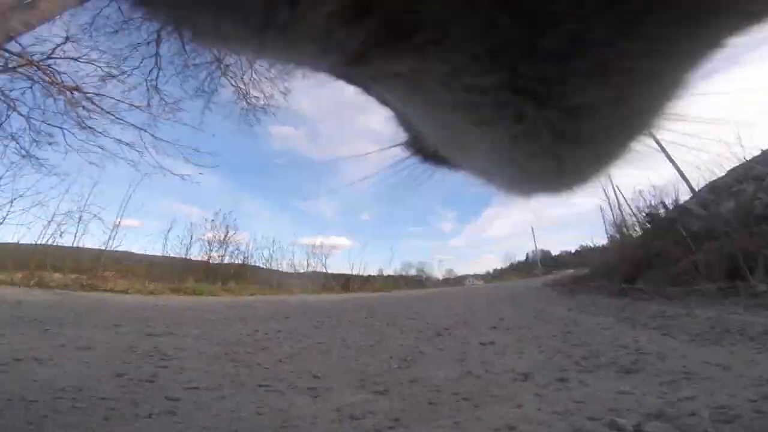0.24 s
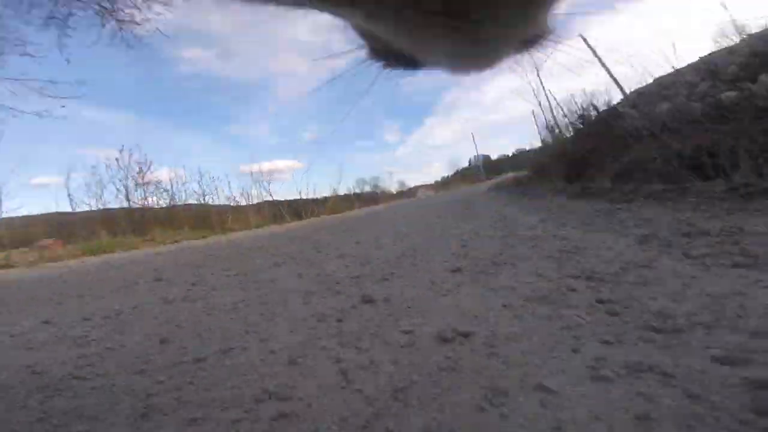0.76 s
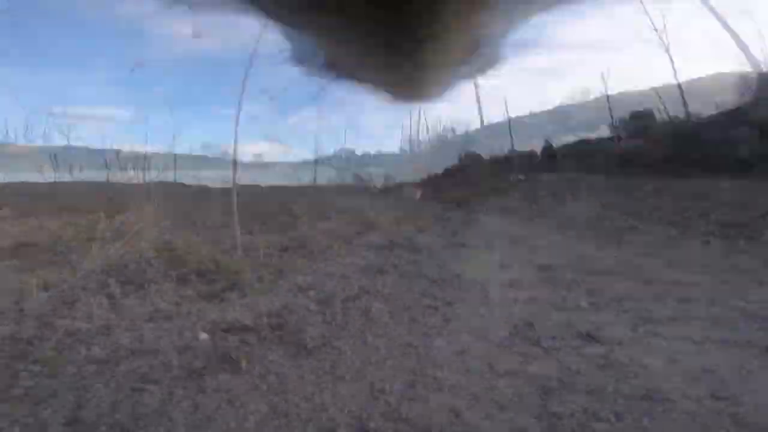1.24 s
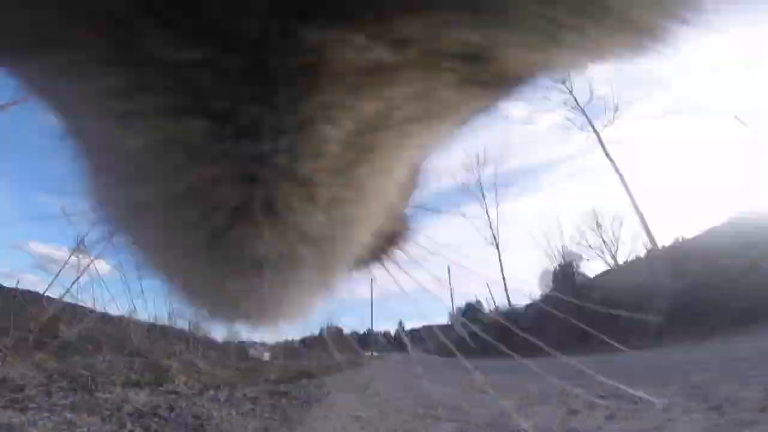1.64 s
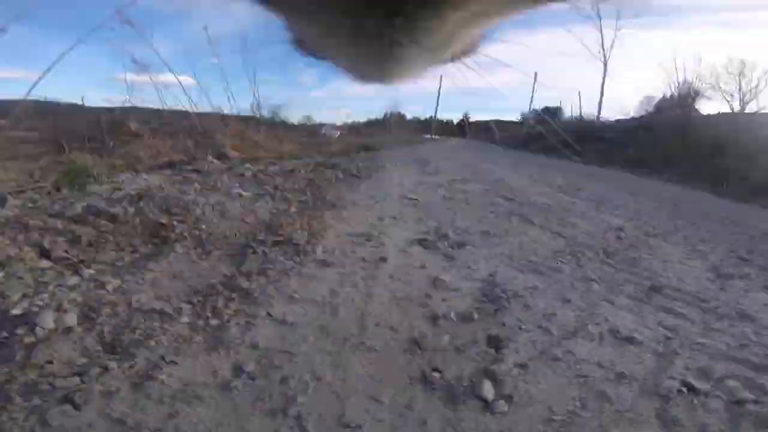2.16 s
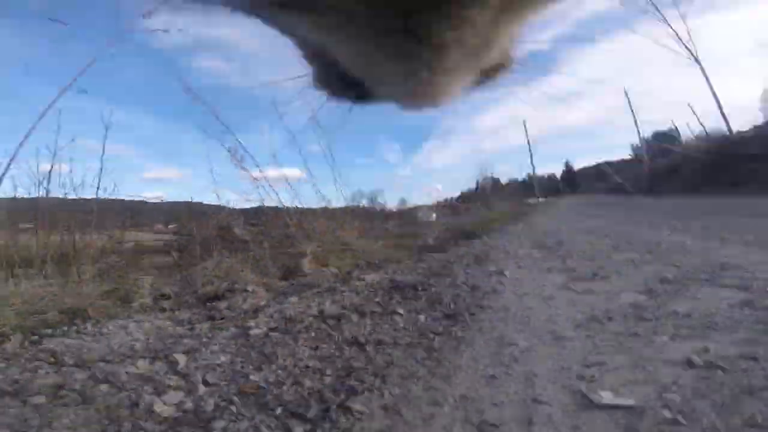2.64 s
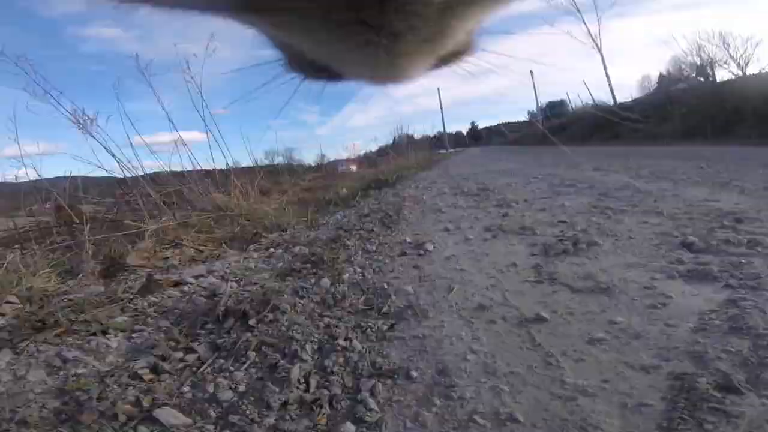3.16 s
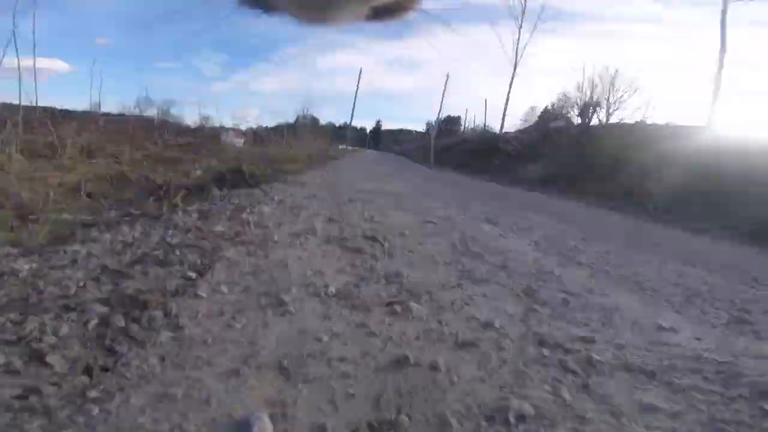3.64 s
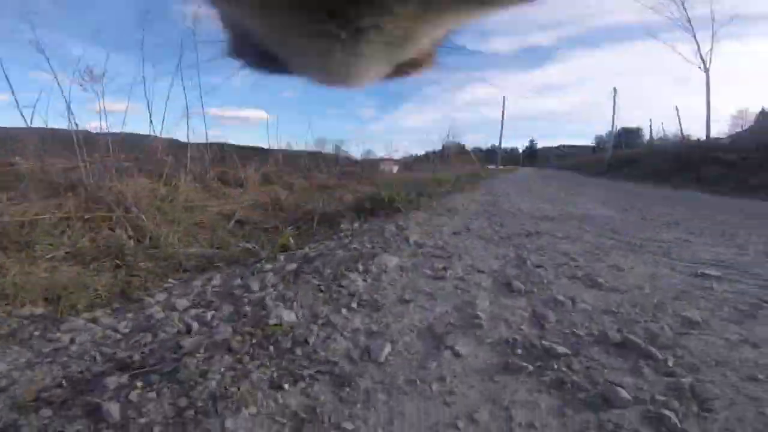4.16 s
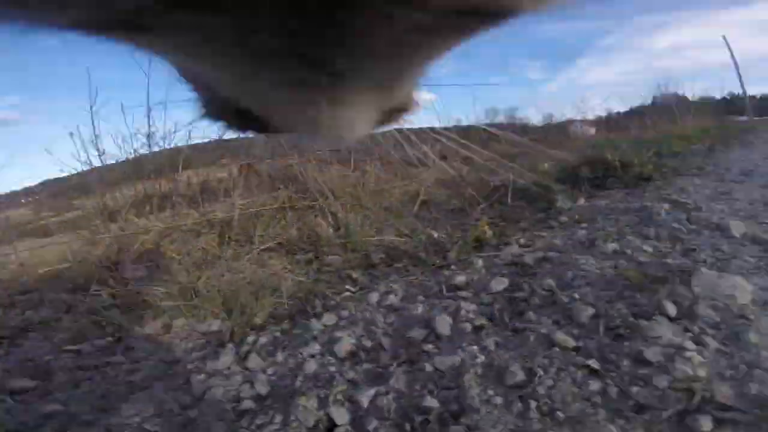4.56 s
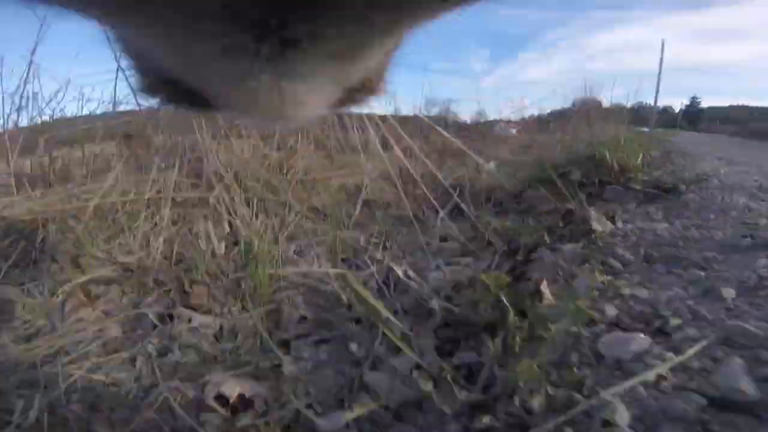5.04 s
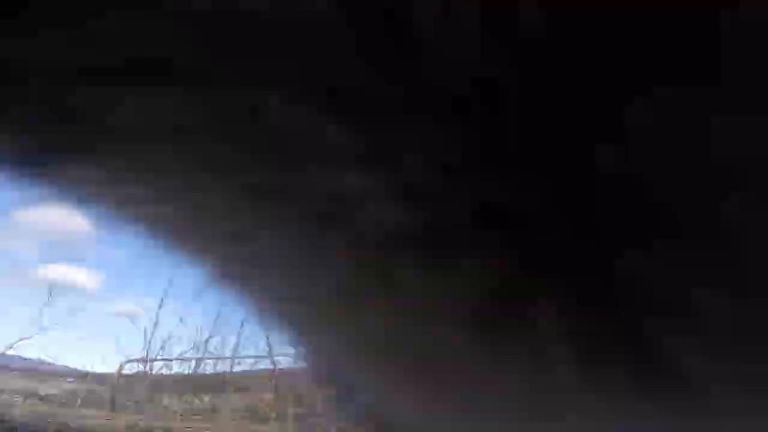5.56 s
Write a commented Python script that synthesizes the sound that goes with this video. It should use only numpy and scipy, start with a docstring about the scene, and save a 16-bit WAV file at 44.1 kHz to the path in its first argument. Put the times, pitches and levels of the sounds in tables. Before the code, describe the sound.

Close, uneven knocks, clicks and furry scuffs from a small camera swinging on a cat's collar, over lightly crunching grit.

```python
"""Fur rubs along the case of a small camera hanging from the collar of a cat trotting on gravel.
Grit crunches below, over a faint steady hiss. Each stride swings the camera: air and strap push
the microphone slowly, the body thumps it and the mount ticks against the plastic shell.
For a moment a thin hiss rings, as if the collar were pulled tight; now and then the port seals and pops."""
import sys
import numpy as np
from scipy import signal
from scipy.fft import rfft, irfft, next_fast_len
from scipy.io import wavfile
from scipy.ndimage import uniform_filter1d

SR = 44100
rng = np.random.default_rng(int(sys.argv[2]) if len(sys.argv) > 2 else 0)


def store_wav(level_fs):
    """Save 16-bit WAV to argv[1]."""
    pcm = np.round(np.clip(np.atleast_2d(level_fs), -1, 1) * 32767)
    wavfile.write(sys.argv[1], SR, pcm.T.astype(np.int16))


N = 256220


def from_db(db):
    """Decibels to gain."""
    return 10 ** (np.asarray(db) / 20)


def rms_one(x):
    """Scale to unit rms."""
    return x / np.sqrt(np.mean(x ** 2) + 1e-20)


def in_time(rows):
    """Curve of (seconds, value) rows, one value per sample."""
    return np.interp(np.arange(N) / SR, *np.transpose(rows))


def butter(x, order, hz, kind="low"):
    """Butterworth filter."""
    return signal.sosfilt(signal.butter(order, hz, kind, fs=SR, output="sos"), x)


def colour(x, points):
    """Shape by a spectrum of (Hz, dB), falling 29 dB per octave outside it; rms 1."""
    hz, db = np.transpose(points)
    size = next_fast_len(N)
    octave = np.log2(np.arange(1, size // 2 + 2) * SR / size)
    outside = np.maximum(np.log2(hz[0]) - octave, 0) + np.maximum(octave - np.log2(hz[-1]), 0)
    gain = from_db(np.interp(octave, np.log2(hz), db) - 29 * outside)
    return rms_one(irfft(rfft(x, size) * gain, size)[:N])


def drift(rate_hz):
    """Slow random wander; rms 1."""
    r = np.exp(-2 * np.pi * rate_hz / SR)
    return rms_one(signal.lfilter([1], [1, -2 * r, r * r], rng.standard_normal(N + SR))[SR:])


def ring(clicks, hz, t60):
    """One mode: a unit click starts a decaying sine of height 1."""
    r, w = from_db(-60 / (t60 * SR)), 2 * np.pi * hz / SR
    return signal.lfilter([0, np.sin(w)], [1, -2 * r * np.cos(w), r * r], clicks + 1e-18)


def resonate(x, modes):
    """Drive a bank of (Hz, dB, t60 seconds) modes; rms 1."""
    return rms_one(sum(from_db(db) * ring(x, hz, t60) for hz, db, t60 in modes))


def bursts(start_s, hold_s, peak_db, rise_db_per_s, fall_db_per_s, rest_db):
    """Gain of bursts that rise, hold and fall over a resting level."""
    t = np.arange(0, N + 32, 32)[:, None] / SR
    before_db = rise_db_per_s * np.maximum(start_s - t, 0)
    after_db = fall_db_per_s * np.maximum(t - start_s - np.abs(hold_s), 0)
    power = np.sum(from_db(peak_db - before_db - after_db) ** 2, axis=1) + from_db(rest_db) ** 2
    return np.interp(np.arange(N) / SR, t[:, 0], np.sqrt(power))


def click_sizes(spread_db):
    """One random signed size per sample, mostly small."""
    return from_db(spread_db * np.minimum(rng.exponential(1, N), 4)) * rng.choice([-1, 1], N)


def slips(per_s, spread_db, smooth):
    """Hairs catch and let go: uneven clicks over smooth drag noise."""
    sizes = click_sizes(spread_db)
    caught = rng.random(N) < per_s / SR
    return rms_one(sizes * caught) + smooth * rng.standard_normal(N)


def grit(per_s, range_hz, cycles):
    """Gravel shifts in clumps, each grain ringing briefly at one of ten pitches; rms 1."""
    sizes = click_sizes(spread_db=3)
    struck = rng.random(N) < per_s * from_db(5 * drift(25)) / SR
    pitch_index = rng.integers(0, 10, N)
    pitches_hz = np.geomspace(*range_hz, 10)
    return rms_one(sum(ring(sizes * struck * (pitch_index == k), hz, cycles / hz)
                       for k, hz in enumerate(pitches_hz)))


# Plastic shell modes. Each row: frequency in Hz, relative gain in dB, t60 in seconds.
SHELL_MODES = [(820, 6.5, 0.00091), (1552, -4.5, 0.011), (2070, 4, 0.0088), (2510, 6.5, 0.0091),
               (2790, 7, 0.0032), (3270, -12, 0.0098), (3710, -4.5, 0.011), (4360, 5, 0.001),
               (5930, 6, 0.0096), (7980, 11, 0.0033)]
# Rustle spectrum. Each row: frequency in Hz, relative gain in dB.
RUSTLE_SPECTRUM = [(750, -3), (1050, 1), (1700, 0.5), (2600, -3.5), (3600, -11), (4300, -22)]


def rustle(drag):
    """Midrange of the drag, with a trace of shell ring and coarse stones shifting."""
    stones = from_db(-8.5) * grit(per_s=90, range_hz=(900, 4260), cycles=11.5)
    return colour(drag + 0.051 * resonate(drag, SHELL_MODES) + stones, RUSTLE_SPECTRUM)


# Fur hiss spectrum. Each row: frequency in Hz, relative gain in dB.
HISS_SPECTRUM = [(3300, -1.5), (4300, -4.5), (5200, 1.5), (6300, -2), (7000, -5), (10000, -15.5),
                 (13500, -29)]


def fur_hiss():
    """Dense small hair slips, with fine grains crunching."""
    hairs = slips(per_s=3000, spread_db=1.5, smooth=2.6) / 1.47
    grains = from_db(-7.5) * grit(per_s=250, range_hz=(3600, 9300), cycles=17)
    return colour(hairs + grains, HISS_SPECTRUM)


# Spectra of the two low bands of the rub. Each row: frequency in Hz, relative gain in dB.
RUMBLE_SPECTRUM = [(60, -6.5), (100, 0), (260, -9), (340, -21)]
SCUFF_SPECTRUM = [(220, 7.5), (320, 9.5), (600, 4.5), (900, -5.5), (1200, -11.5)]
# Fur strokes. Each row: peak time in seconds, swell in seconds, fade in seconds, scuff level in dB,
# rumble over scuff in dB, hiss over scuff in dB.
FUR_STROKES = [(.005,0.07,0.018,-55,7,-13),(0.112,0.11,0.094,-49,7,-14),(0.258,0.14,0.079,-55.5,13,-13.5),
               (.39,0.1,0.074,-55,10,-10),(.441,0.16,0.22,-52.5,-1,-29),(.535,0.15,0.1,-60,16,-1),
               (.69,0.055,0.026,-61.5,10,2),(.79,0.1,0.14,-55,-1,-15),(0.86,0.079,0.056,-47,-6,-11.5),
               (.99,0.14,0.091,-54.5,7,-12.5),(1.09,0.22,0.2,-61.5,7.5,-12),(1.207,0.04,0.031,-56,7,-17),
               (1.286,0.011,0.026,-35.5,-21,-19.5),(1.335,.03,0.042,-51,9,-23),(1.41,0.083,0.35,-58.5,-1,-11),(1.535,0.054,0.045,-45,1,-15),
               (1.6,0.076,0.048,-52,10,-5.5),(1.681,0.079,0.052,-58,14,-26),(1.795,0.088,0.11,-58,12.5,-10),
               (1.87,0.034,0.52,-53.5,0,-19),(1.95,0.13,0.24,-63,-6,-5.5),(2.049,0.025,0.017,-51.5,11,-10),
               (2.208,0.046,0.15,-56.5,3,-10.5),(2.25,0.075,0.072,-54,14.5,-15.5),(2.35,0.062,0.069,-62,7,-5.5),
               (2.494,0.028,0.058,-61.5,16,-1.5),(2.58,0.21,0.29,-59.5,4,-21),(2.68,0.14,0.11,-60,1,-8),
               (2.766,0.2,0.035,-61.5,0,-39),(2.898,0.069,0.13,-47.5,4.5,-16),(2.97,0.052,0.092,-63.5,15,0.5),
               (3.041,0.067,0.025,-58,6,-4.5),(3.264,0.12,0.22,-44,4,-17.5),(3.34,0.093,0.14,-62,8,-1.5),
               (3.41,0.38,0.038,-68,19,2),(3.613,0.074,0.13,-47.5,7,-15),(3.77,0.042,0.052,-77,15,-28),
               (3.844,0.13,0.12,-57,13,-11.5),(4.007,0.097,0.096,-43,3,-16.5),(4.269,0.11,0.073,-48,2.5,-16.5),
               (4.37,0.054,0.48,-61,4,-12.5),(4.556,0.085,0.079,-62.5,19,-8.5),(4.753,0.083,0.23,-55,4.5,-7),
               (4.88,0.041,0.18,-64.5,24.5,-2),(4.991,0.019,0.11,-55.5,13,-2),(5.09,0.13,0.21,-53.5,3.5,-7.5),
               (5.16,0.089,0.079,-55.5,-8,-6),(5.25,0.07,0.17,-60.5,-5,2),(5.386,0.036,0.33,-46.5,-11,-15),
               (5.449,0.11,0.082,-46.5,5.5,-16.5),(5.55,0.26,0.063,-53,12.5,-2.5),(5.59,0.062,0.081,-45.5,0,-7),
               (5.64,0.12,0.062,-58.5,13,12.5),(5.7,0.044,0.024,-56,4,-3),(5.753,0.031,0.061,-37,4,-15.5),(5.8,0.015,0.12,-39,-2,-17)]


def fur_rub():
    """Fur drags along the case under uneven pressure: rumble, scuff, rustle and hiss."""
    peak_s, swell_s, fade_s, scuff_db, rumble_over_db, hiss_over_db = np.transpose(FUR_STROKES)
    span_db = 20  # gained over a swell, lost over a fade

    def strokes(over_db, rest_db):
        return bursts(peak_s, 0, scuff_db + over_db,
                      span_db / np.abs(swell_s), span_db / np.abs(fade_s), rest_db)

    pressure_db, grip = 2.4 * drift(30), drift(70)
    coarse_drag = slips(per_s=200, spread_db=4.1, smooth=0.5)
    drag = slips(per_s=1500, spread_db=3.2, smooth=1.28)
    rumble = colour(coarse_drag, RUMBLE_SPECTRUM) * strokes(rumble_over_db, rest_db=-66)
    scuff = colour(drag, SCUFF_SPECTRUM) * strokes(0, rest_db=-86)
    rustling = rustle(drag) * strokes(1.5 + 0.69 * hiss_over_db, rest_db=-103)
    hiss = fur_hiss() * strokes(hiss_over_db, rest_db=-83.5)
    return (rumble * from_db(pressure_db)
            + scuff * from_db(pressure_db + 1.2 * grip)
            + rustling * from_db(pressure_db + 2.2 * grip)
            + hiss * from_db(pressure_db / 2 + 2.36 * drift(52)))


# Spectra of the self-noise and the top hiss. Each row: frequency in Hz, relative gain in dB.
FLOOR_SPECTRUM = [(2000, -4.5), (3300, -4.5), (3700, -1), (4100, -23), (6000, -9.5), (8800, -7)]
TOP_SPECTRUM = [(9000, -1), (11000, 0), (13500, -1.5)]
# Top hiss envelope. Each row: time in seconds, relative level in dB.
TOP_ENVELOPE = [(0.0, -76), (0.76, -75.5), (1.47, -75.5), (1.84, -95), (2.07, -90), (3.04, -79),
                (5.28, -74.5), (5.8, -87.5)]


def noise_floor():
    """Flickering self-noise, and a faint top hiss that fades and returns."""
    floor = from_db(-77 + 1.8 * drift(18)) * colour(rng.standard_normal(N), FLOOR_SPECTRUM)
    top_db = in_time(TOP_ENVELOPE) - 4 + 1.9 * drift(18)
    return floor + from_db(top_db) * colour(rng.standard_normal(N), TOP_SPECTRUM)


# Push spectrum. Each row: frequency in Hz, relative gain in dB.
PUSH_SPECTRUM = [(7, 0), (22, 0), (40, -6), (68, -15)]
# Camera swings. Each row: start of the hold in seconds, hold in seconds, level in dB.
CAMERA_SWINGS = [(0.026, 0.13, -34), (0.294, 0.045, -34.5), (0.39, 0.077, -36), (0.488, 0.073, -35.5),
                 (0.594, 0.028, -39), (0.842, 0.038, -27.5), (1.066, 0.014, -36), (1.217, 0.15, -34.5),
                 (1.551, 0.053, -29.5), (1.556, 0.017, -37), (1.873, 0.024, -27), (1.966, 0.024, -33.5),
                 (2.22, 0.019, -28), (2.296, 0.044, -33.5), (2.548, 0.053, -33.5), (2.61, 0.063, -38.5),
                 (2.703, 0.065, -37.5), (2.92, 0.082, -36), (3.227, 0.05, -30), (3.295, 0.095, -31.5),
                 (3.597, 0.093, -29), (3.899, 0.04, -28.5), (4.038, 0.022, -26), (4.265, 0.084, -35),
                 (4.71, 0.16, -45.5), (5.047, 0.045, -35), (5.358, 0.017, -35), (5.45, 0.056, -27.5),
                 (5.779, 0.014, -26)]


def camera_swing():
    """Air and strap push the microphone at each swing: lumpy, largely infrasonic pressure."""
    push = colour(rng.standard_normal(N), PUSH_SPECTRUM)
    push /= np.sqrt(uniform_filter1d(push ** 2, size=3600) + 0.99)  # evened so the stride sets the size
    stride = bursts(*np.transpose(CAMERA_SWINGS), rise_db_per_s=253, fall_db_per_s=270, rest_db=-47)
    return stride * rms_one(push)


# Body blows. Each row: crest time in seconds, relative level in dB, pitch in Hz, push (1) or pull (-1).
BODY_THUMPS = [(0.0402, -23, 160, 1), (0.1342, -42, 230, 1), (0.2758, -28.5, 110, 1),
               (0.344, -29.5, 230, 1), (0.537, -25, 260, 1), (0.612, -22, 18, -1), (0.635, -26, 24, 1),
               (0.6423, -38, 250, -1), (0.7102, -26, 230, 1), (0.853, -18.5, 26, 1), (0.894, -20, 26, -1),
               (0.916, -36, 24, 1), (0.864, -34, 280, -1), (0.8723, -28.5, 220, -1), (0.947, -34, 220, 1),
               (1.1298, -34.5, 350, 1), (1.2865, -11, 98, 1), (1.327, -43, 130, 1), (1.4002, -32, 510, -1),
               (1.5242, -20.5, 113, -1), (1.539, -19, 440, 1), (1.6718, -24.5, 217, 1),
               (1.6931, -29.5, 270, 1), (1.706, -27, 290, 1), (1.781, -34, 290, -1), (1.79, -32, 340, -1),
               (1.833, -30, 530, 1), (1.84, -15.5, 38, 1), (1.858, -16, 20, -1), (1.877, -19, 22, 1),
               (1.7985, -35.5, 240, -1), (1.903, -31, 140, 1), (2.049, -27, 185, 1), (2.189, -25.5, 41, 1),
               (2.202, -23.5, 450, 1), (2.239, -23.5, 330, 1), (2.478, -33.5, 226, -1),
               (2.5035, -33.5, 480, -1), (2.53, -29.5, 226, -1), (2.748, -33, 200, -1),
               (2.7728, -32, 440, -1), (2.782, -29.5, 210, 1), (2.936, -20, 12.7, 1),
               (2.977, -20, 15.7, -1), (3.0312, -29.5, 220, -1), (3.045, -27.5, 260, 1),
               (3.179, -29, 240, -1), (3.207, -19.5, 31, 1), (3.226, -15, 36, -1), (3.275, -14.5, 15, 1),
               (3.335, -19.5, 18.3, -1), (3.376, -18.5, 24, 1), (3.4398, -18.5, 233, 1),
               (3.68, -30, 29, -1), (3.7642, -18.5, 263, 1), (3.8692, -27.5, 225, -1),
               (3.9968, -23, 230, 1), (4.049, -21, 23, 1), (4.067, -12, 18.3, -1), (4.088, -29, 19, 1),
               (4.091, -32, 180, 1), (4.3573, -27.5, 174, 1), (4.561, -23, 270, 1), (4.695, -31, 206, -1),
               (4.8125, -28.5, 290, -1), (4.877, -23.5, 217, 1), (4.885, -22.5, 184, 1),
               (4.983, -19.5, 76, 1), (5.153, -26, 206, 1), (5.3626, -17, 320, 1), (5.371, -19.5, 31, -1),
               (5.47, -15, 19, -1), (5.3888, -22.5, 82, 1), (5.448, -21, 170, 1), (5.513, -30, 310, -1),
               (5.575, -15, 200, 1), (5.5913, -13.5, 224, 1), (5.6027, -16, 330, 1), (5.7359, -12.5, 95, 1),
               (5.75, -10, 64, 1), (5.763, -9.5, 30.7, -1)]


def body_thumps():
    """Soft blows set the whole camera in a damped swing; pulls ring longer, hard blows die sooner."""
    out, t = np.zeros(N + SR), np.arange(SR // 4) / SR
    for crest_s, level_db, hz, direction in BODY_THUMPS:
        start = round((crest_s - 0.204 / hz) * SR)  # contact is nearly a quarter cycle before the crest
        t60_cycles = (2.85 if direction > 0 else 4.1) * np.exp(-0.0225 * (level_db + 30))
        blow = np.sin(2 * np.pi * hz * t) * from_db(-60 * t * hz / t60_cycles)
        out[start:start + len(t)] += np.sign(direction) * from_db(level_db + 2) * blow
    return butter(out[:N], 1, 2500)


ROCK_S, MIN_BREADTH_OCT = 0.0006, 0.15


def faint_ticks(per_s):
    """Weak contacts at random times, as rows like MOUNT_TICKS."""
    when, low, upper, pitch = rng.random((round(per_s * N / SR), 4)).T
    start_s = when * (N / SR - ROCK_S * 2)
    low_db, upper_db = -54 + 3 * np.log([low + 0.05, upper + 0.05])
    centre_hz = 3400 * 2 ** (pitch - 0.5)
    return np.transpose([start_s, low_db, upper_db, centre_hz, np.full_like(when, 0.5)])


def contact_snaps(start_s, upper_db, centre_hz, breadth_oct):
    """Each contact rings a few cycles at its own pitch, shorter and weaker when broad."""
    out, t = np.zeros(N + 512), np.arange(512) / SR
    peaks = from_db(upper_db - 1.5 - 13 * breadth_oct)
    crest_cycles = 0.57 / np.sqrt(np.maximum(breadth_oct, MIN_BREADTH_OCT))
    for when_s, peak, hz, cycles in zip(start_s, peaks, centre_hz, crest_cycles):
        start = round(when_s * SR)
        age = t * hz / cycles
        envelope = (age * np.exp(1 - age)) ** 2
        out[start:start + 512] += peak * envelope * np.sin(2 * np.pi * hz * t)
    return out[:N]


def shell_ring(start_s, low_db, upper_db, centre_hz, breadth_oct):
    """Contacts strike the shell: a low ring, and upper modes strongest near each contact's centre."""
    strike = np.round(start_s * SR).astype(int)
    rock_back = np.round((start_s + ROCK_S) * SR).astype(int)
    mode_hz, mode_db, _ = np.transpose(SHELL_MODES)
    upper = mode_hz > 1800
    off_centre = np.log2(mode_hz[:, None] / centre_hz) / np.maximum(breadth_oct, MIN_BREADTH_OCT)
    shares = from_db(mode_db[:, None] - np.minimum(4 * off_centre ** 2, 20))
    shares /= np.sqrt(np.sum(shares[upper] ** 2, axis=0))
    narrow_loss_db = 4.5 * (1 - np.minimum(breadth_oct, 1))
    out = np.zeros(N)
    for (hz, db, t60), share, is_upper in zip(SHELL_MODES, shares, upper):
        scatter, rebound, polarity = rng.standard_normal((len(start_s), 3)).T
        size = share * from_db(upper_db - narrow_loss_db) if is_upper else from_db(low_db + db + 5)
        size *= from_db(2.5 * scatter)
        clicks = np.zeros(N)
        clicks[strike] = size * (1 if is_upper else np.sign(polarity))  # upper modes follow the snap
        clicks[rock_back] = 0.25 * size * rebound
        drive = butter(clicks + 1e-18, 1, [hz * 0.68, hz * 1.26], "band")  # ring swells over a cycle
        out += ring(drive, hz, t60)
    return out


# Mount contacts. Each row: start in seconds, relative levels of the low and the upper ring in dB,
# centre of the upper ring in Hz, breadth in octaves.
MOUNT_TICKS = [(0.0402, -36, -42, 3280, 0.34), (0.102, -42.5, -42, 3330, 0.5), (0.116, -35, -23, 3180, 0.1),
               (0.3435, -40.5, -45, 3180, 0.3), (0.4644, -34.5, -47, 2790, 0.74),
               (0.489, -40, -43, 3370, 0.68), (0.5126, -51, -30.5, 3100, 0.26),
               (0.534, -29.5, -32, 3100, 0.29), (0.5372, -31.5, -19.5, 3070, 0.1),
               (0.5517, -61, -39, 4010, 0.55), (0.5868, -37.5, -35.5, 3710, 0.2),
               (0.6145, -49, -41, 7200, 0.5), (0.6921, -32, -31, 3270, 0.14),
               (1.1297, -36, -32, 3350, 0.46), (1.2005, -59, -52, 2600, 0.76),
               (1.2385, -50, -33, 2040, 0.36), (1.2635, -56, -45, 3300, 0.44),
               (1.2791, -40, -37, 2870, 0.37), (1.2844, -33, -45, 3720, 0.46),
               (1.3404, -36, -33.5, 2400, 0.1), (1.399, -48, -28.5, 4700, 0.23),
               (1.4091, -34.5, -31.5, 2350, 0.49), (1.442, -37.5, -36, 2600, 0.43),
               (1.5233, -42, -35, 4550, 0.66), (1.5377, -33, -29, 4550, 0.93),
               (1.5512, -51, -40, 4460, 0.94), (1.6513, -45, -39, 3040, 0.62), (1.663, -46, -46, 2200, 0.5),
               (1.6715, -52, -39, 5120, 0.52), (1.6937, -37, -33, 4740, 0.45),
               (1.7048, -61, -38, 3600, 0.82), (1.7199, -47, -43, 2600, 0.57),
               (1.7803, -35, -31.5, 3000, 0.64), (1.8308, -50, -45, 2560, 0.57),
               (1.9046, -44.5, -36, 4300, 0.87), (1.9339, -47, -38.5, 3300, 0.32),
               (1.9917, -47, -26.5, 3600, 0.43), (2.0453, -40, -36, 3740, 0.52),
               (2.0551, -50, -38, 3170, 0.6), (2.2016, -65, -33.5, 4500, 0.69),
               (2.237, -47, -34.5, 3500, 1), (2.2626, -41.5, -35.5, 3650, 0.98),
               (2.3373, -37, -27.5, 3420, 0.52), (2.4237, -37.5, -38, 3140, 0.48),
               (2.5035, -55.0, -36, 4520, 0.24), (2.5271, -35.5, -33, 3520, 0.75),
               (2.6242, -40, -32, 3260, 0.32), (2.7007, -48.5, -43, 3270, 0.36),
               (2.7471, -38.5, -29.5, 3970, 0.3), (2.7826, -40, -29, 3250, 0.6),
               (3.0385, -44, -38, 3700, 0.31), (3.055, -46.5, -47, 2500, 0.47),
               (3.172, -36.5, -26.5, 3900, 0.43), (3.1785, -37, -37, 3300, 0.2),
               (3.2102, -44, -44, 3160, 0.93), (3.2592, -38.5, -42, 3360, 0.76),
               (3.319, -43, -33.5, 3100, 0.16), (3.3984, -38, -31.5, 3550, 0.25),
               (3.42, -30, -34, 2570, 0.4), (3.4414, -39, -32, 3030, 0.85), (3.6191, -44, -42, 3550, 0.97),
               (3.762, -29.5, -27.5, 3240, 0.92), (3.7905, -44, -56, 2300, 0.44),
               (3.8268, -44, -35.5, 3840, 0.46), (3.8518, -36, -26.5, 3570, 0.48),
               (3.9948, -44, -28.5, 2900, 0.11), (4.0342, -41, -39.5, 4130, 0.93),
               (4.091, -40, -26.5, 3100, 0.44), (4.157, -52, -45, 3300, 0.37),
               (4.3542, -39, -30, 3640, 0.41), (4.5124, -43.5, -39, 4500, 0.43),
               (4.527, -45, -58, 2500, 0.4), (4.5611, -50, -34, 2800, 0.21), (4.696, -50, -59, 2500, 0.5),
               (4.8125, -50, -46, 3600, 0.37), (4.863, -64, -45, 7600, 0.33), (4.8701, -33, -35, 2510, 1),
               (4.8761, -36.5, -34.5, 3420, 0.38), (4.9865, -65, -33, 4030, 0.48),
               (4.9925, -60, -43, 2640, 0.35), (5.001, -60, -40, 3700, 0.16),
               (5.0165, -40.5, -43, 3600, 0.53), (5.1072, -33, -22, 3200, 0.4),
               (5.1498, -36, -42, 3760, 0.43), (5.163, -40.5, -41, 3690, 0.33),
               (5.172, -43, -44, 3570, 0.38), (5.3899, -50, -36, 5600, 0.3),
               (5.2346, -40.5, -55, 3650, 0.59), (5.3615, -33.5, -31, 5700, 0.25),
               (5.5128, -33, -18, 4030, 0.11), (5.5132, -42, -27, 2230, 0.23),
               (5.5412, -53.4, -41, 2600, 0.25), (5.5505, -52, -39, 2500, 0.3),
               (5.5681, -36, -26, 4100, 0.57), (5.5743, -23, -25, 2980, 0.54),
               (5.5899, -40, -26.5, 5200, 0.28), (5.6023, -40, -21.5, 3370, 0.89),
               (5.638, -55, -42, 5100, 0.42), (5.6556, -61, -27, 4700, 0.13),
               (5.6595, -39, -25, 4350, 0.23), (5.6672, -38, -35, 4900, 0.45),
               (5.6726, -47, -30, 4800, 0.14), (5.7242, -39.5, -42, 2880, 0.19),
               (5.7569, -35.5, -39, 4030, 1), (5.7637, -35, -31, 4500, 0.93)]


def mount_ticks():
    """The mount taps the shell, which passes little of one band; soft contact dulls the top."""
    dead_band_hz, contact_hz = (4500, 5400), 7670
    contacts = np.concatenate([MOUNT_TICKS, faint_ticks(per_s=3)])
    start_s, low_db, upper_db, centre_hz, breadth_oct = contacts.T
    ticks = contact_snaps(start_s, upper_db, centre_hz, breadth_oct)
    ticks += shell_ring(start_s, low_db, upper_db, centre_hz, breadth_oct)
    ticks -= 0.7 * butter(ticks, 1, dead_band_hz, "band")
    return butter(ticks, 2, contact_hz)


# Collar hiss envelope. Each row: time in seconds, level in dB.
COLLAR_ENVELOPE = [(1.12, -84), (1.2, -71), (1.45, -62.5), (1.68, -62), (1.76, -80), (1.85, -105)]
# Its resonances. Each row: frequency in Hz, relative gain in dB, t60 in seconds.
COLLAR_MODES = [(2220, -2.5, 0.0046), (4500, -8, 0.0047), (6670, -9.5, 0.0072)]


def tight_collar():
    """Wavering, crackling drag rings in a few resonances as a thin hiss."""
    drag = slips(per_s=600, spread_db=3, smooth=0.8)
    waver_db = 4.5 * drift(30)
    return from_db(in_time(COLLAR_ENVELOPE) + waver_db) * resonate(drag, COLLAR_MODES)


# Pressure steps at the port. Each row: start in seconds, step size in dB, sign.
PORT_STEPS = [(1.2769, -32, 1), (1.3085, -33, -1), (1.3257, -31, 1), (1.331, -33, -1), (1.5197, -32, 1),
              (1.5516, -34, 1), (1.6056, -27, 1), (1.6075, -9.6, -1), (5.7528, -15.2, -1)]


def port_pops(leak_hz=50):
    """The port seals: a pressure step leaks away and overshoots."""
    jumps = np.zeros(N)
    for start_s, step_db, direction in PORT_STEPS:
        jumps[round(start_s * SR)] = np.sign(direction) * from_db(step_db)
    pressure = butter(np.cumsum(jumps), 2, leak_hz, "high")
    return butter(pressure, 3, 6000)


def scene():
    """Everything reaches one microphone through the case."""
    mix = noise_floor() + camera_swing() + fur_rub() + tight_collar()
    mix += mount_ticks() + body_thumps() + port_pops()
    return mix[None]


def record(dry):
    """A steep low-pass cuts the top."""
    stop_db, stop_hz = 70, 14595
    return signal.sosfilt(signal.cheby2(12, stop_db, stop_hz, fs=SR, output="sos"), dry)


dry = scene()
out = record(dry)
store_wav(out)
```